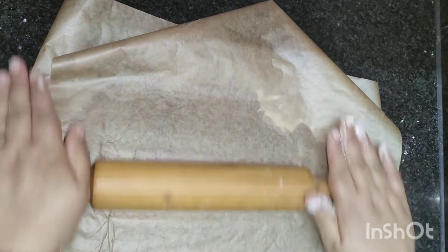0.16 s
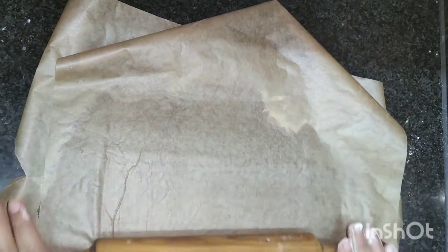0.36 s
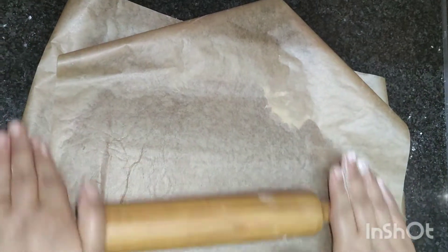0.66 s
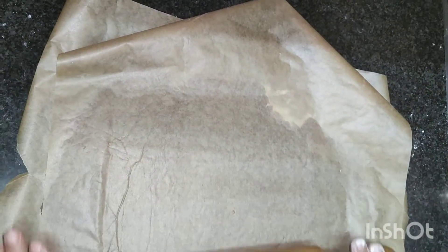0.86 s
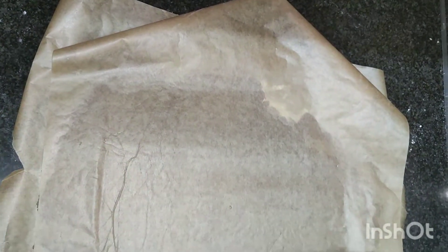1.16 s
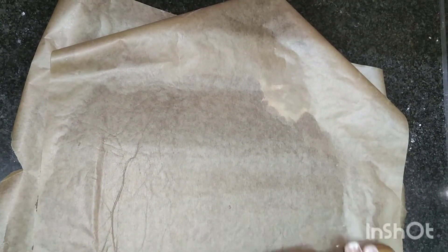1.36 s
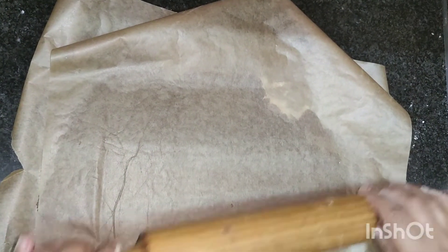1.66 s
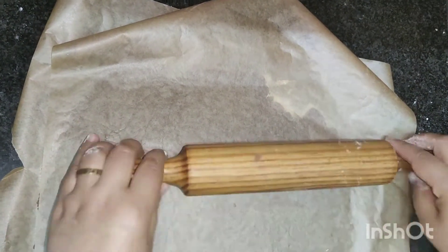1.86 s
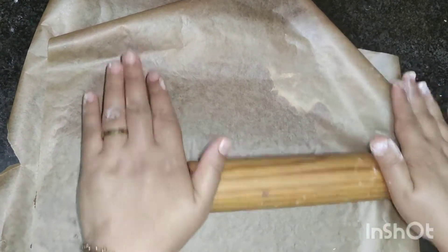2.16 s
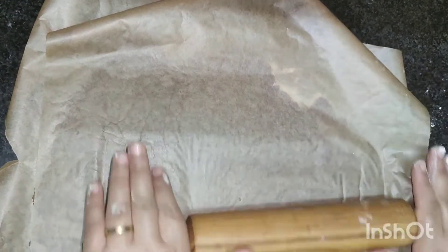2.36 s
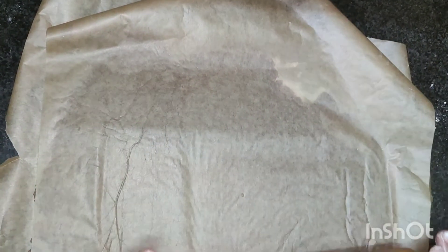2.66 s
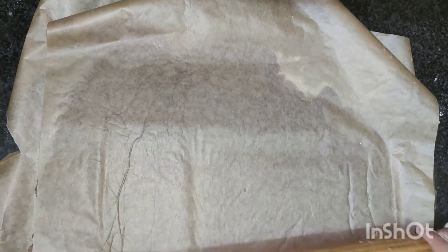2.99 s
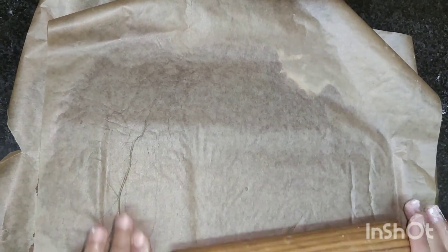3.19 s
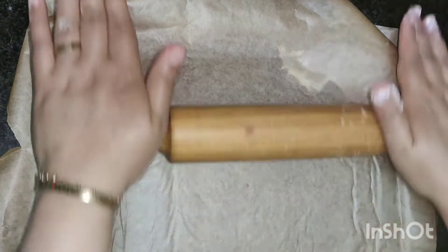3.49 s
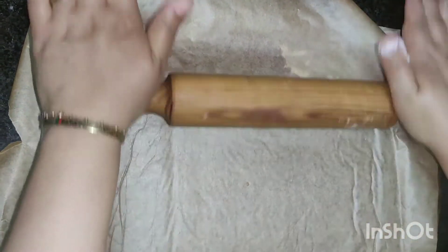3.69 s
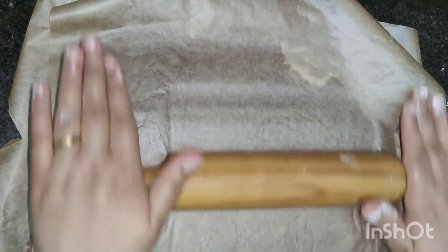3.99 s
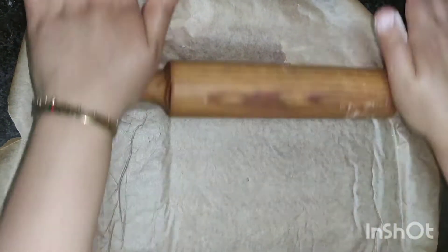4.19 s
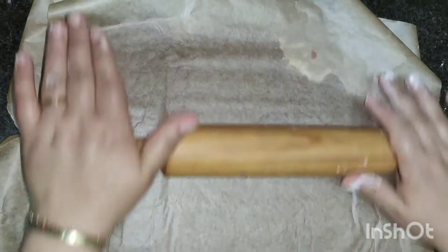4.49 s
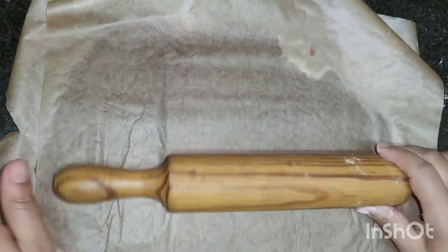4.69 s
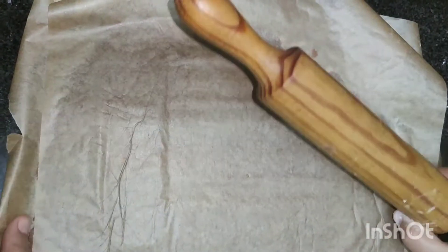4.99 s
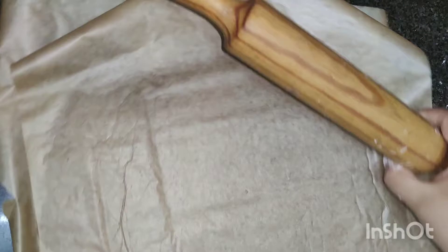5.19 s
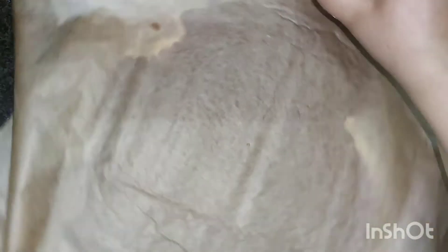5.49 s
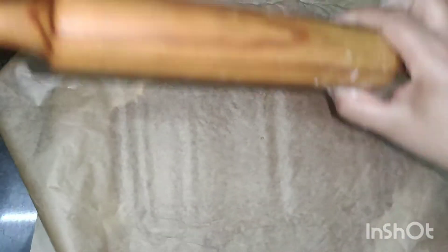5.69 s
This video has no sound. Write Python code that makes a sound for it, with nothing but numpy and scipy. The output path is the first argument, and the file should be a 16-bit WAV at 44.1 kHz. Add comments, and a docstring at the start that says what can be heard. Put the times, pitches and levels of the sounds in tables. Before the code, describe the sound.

Baking paper rustles and crackles under a wooden rolling pin, with a few dull thumps on a kitchen counter.

```python
"""Baking paper rubs and crackles as a wooden rolling pin is pushed over dough between two sheets on a
stone counter; then the sheets are turned. Sliding fibres hiss, the pressed paper sticks and slips, and
the bending sheet buckles in many tiny clicks and snaps at its creases. Set down, the pin clacks and
drives the low modes of the counter in dull thumps. A small kitchen adds a faint hush and a short tail."""
import sys
import numpy as np
from scipy import signal
from scipy.fft import rfft, irfft, next_fast_len
from scipy.io import wavfile
from scipy.ndimage import uniform_filter1d, map_coordinates

SR = 44100
rng = np.random.default_rng(int(sys.argv[2]) if len(sys.argv) > 2 else 0)


def log_audio(samples):
    """Write samples as a 16-bit WAV file to the path given in sys.argv[1]."""
    # one column per channel
    frames = np.atleast_2d(samples).T
    # limit to full scale, then quantise
    limited = np.clip(frames, -1, 1)
    pcm = np.round(limited * 32767).astype(np.int16)
    wavfile.write(sys.argv[1], SR, pcm)


N = 257984

# Pushes of the pin and pulls at the sheet. Each row: arrival at full speed in seconds, hold in seconds,
# run-up in seconds, crisp rustle in dB, duller rub in dB.
STROKES = [(0.095, 0.037, 0.12, -47, -54.5), (0.37, 0.077, 0.25, -54.5, -63),
           (0.53, 0.026, .08, -59.5, -63.5), (0.83, 0.055, 0.041, -47, -69), (0.942, 0.024, .06, -40, -53),
           (1.068, 0.03, .09, -40.5, -49.5), (1.225, 0.037, 0.045, -48, -53.5),
           (1.447, 0.021, 0.21, -41.5, -52.5), (1.598, 0.048, 0.16, -37.5, -49.5),
           (2.135, 0.039, 0.016, -32.5, -42.5), (2.24, 0.022, 0.046, -37, -54),
           (2.329, 0.0097, 0.069, -35.5, -34.5), (2.41, 0.052, 0.099, -36.5, -40),
           (2.53, 0.15, 0.085, -37.5, -45), (2.755, 0.017, 0.083, -29, -46), (2.85, 0.13, 0.12, -41.5, -50),
           (3.29, 0.18, 0.34, -55.5, -64), (3.495, 0.013, 0.076, -35.5, -42),
           (3.645, 0.027, 0.11, -32.5, -39.5), (3.72, 0.24, 0.058, -40.5, -46.5),
           (4.118, 0.13, 0.063, -44, -48), (4.243, 0.086, 0.052, -31, -39), (4.43, 0.081, 0.12, -36, -41),
           (4.691, 0.029, 0.087, -35.5, -44), (4.99, 0.055, 0.22, -34.5, -68),
           (5.159, .12, 0.23, -28, -40.5), (5.399, .12, 0.32, -28.5, -39.5),
           (5.58, 0.044, 0.15, -29.5, -52), (5.669, 0.05, 0.073, -37, -68)]
# The sheet creeping between strokes. Two values: rustle in dB, rub in dB.
CREEP_DB = [-67.5, -69]
# The loudest creases. Each row: start in seconds, level in dB, ripple in seconds, bass boost in dB.
CREASE_SNAPS = [(0.141, -31, 0.0039, -8), (0.226, -43, 0.007, -2), (0.283, -49.5, .006, 14),
                (0.327, -45.5, 0.0061, 24), (0.348, -41.5, 0.0052, 6.5), (0.814, -33.5, 0.0012, 15.5),
                (0.829, -35.5, 0.0049, 2), (0.852, -38, .002, 2), (0.873, -34.5, 0.0091, -5),
                (0.963, -35.5, 0.0056, -4), (1.018, -33.5, 0.0023, 2.5), (1.28, -37, 0.0038, 11.5),
                (1.366, -41.5, 0.0046, 6), (1.464, -35.5, 0.011, 1), (1.626, -27.5, 0.0017, -2),
                (2.11, -39.5, 0.014, 5), (2.137, -28, 0.012, -1.5), (2.242, -21.5, .001, -2.5),
                (2.309, -27.5, 0.012, -13), (2.332, -20.5, 0.0011, 0), (2.428, -20, 0.0053, -4),
                (2.446, -18.5, 0.0011, -22), (2.493, -26, 0.0056, -11), (2.523, -25, 0.01, -3),
                (2.560, -18.5, 0.0017, -21), (2.574, -25, 0.002, -2), (2.632, -27.5, 0.0098, -8),
                (2.713, -23.5, 0.011, -5.5), (2.805, -22, .011, -2.5), (2.973, -23.5, 0.00064, -2),
                (3.048, -37.5, 0.00033, -4), (3.173, -39, 0.01, 8), (3.273, -49, .007, 19),
                (3.509, -30.5, 0.0082, 3), (3.6321, -21.5, 0.0019, 4), (3.740, -23.5, .003, 2),
                (3.971, -31.5, 0.0086, -4), (4.165, -34, 0.0049, 0), (4.217, -24, 0.0088, -1),
                (4.230, -27, 0.0073, 7), (4.325, -23.5, 0.0061, 5.5), (4.442, -18.5, 0.0014, -7),
                (4.600, -39, 0.0064, 7.5), (4.773, -36, 0.0052, -18), (4.905, -20.5, 0.0018, 1.5),
                (4.968, -22.5, 0.0039, -35), (4.997, -26, .012, -8.5), (5.137, -18, 0.0024, -28),
                (5.181, -22.5, 0.013, -3), (5.280, -19, .004, 0.5), (5.505, -25, 0.016, -1.5),
                (5.599, -27.5, 0.017, -16)]
# Landings of the pin. Each row: start in seconds, push in dB, counter ring in dB, wooden clack in dB.
LANDINGS = [(0.6632, -57, -44.5, -64), (1.8836, -22, -26, -16), (2.138, -29.5, -34, -45),
            (3.1561, -37, -22.5, -34.5), (4.217, -61, -44.5, -56), (4.686, -46, -31.5, -44),
            (5.603, -41, -42.5, -29)]
# Normal modes. Each row: frequency in Hz, level in dB, time to decay by 60 dB in seconds.
COUNTER_MODES = [(64, -6, 0.36), (90, -14, 0.59), (110.3, -2, 0.44), (117.4, 2.5, 0.13), (145, -9, 0.27),
                 (232, -19, 0.1)]
PIN_MODES = [(320, -17, .12), (366, -20, .16), (560, -21, .08), (700, -17, .08), (985, -16, .07),
             (1070, -16, .08), (1400, -13, .06), (2650, -9, .05), (6900, -2, .025)]
# Spectra of the noise sources. Each row: frequency in Hz, relative spectral density in dB.
HUSH_SPECTRUM = [(20, 13.5), (60, 2.5), (105, 10.5), (160, 4), (240, -9.5), (400, -3), (800, -18.5),
                 (2000, -31), (7000, -68), (9000, -30), (15500, -23)]
SLAP_SPECTRUM = [(100, -4), (250, 5), (450, -15), (1200, -1), (3000, 2), (5500, -3.5), (7200, 3.5),
                 (9000, -13), (15000, -12.5)]
SNAP_SPECTRUM = [(150, -17), (400, -10), (1200, -4), (2700, -1.5), (4500, 0), (7300, 1.5), (8200, -3),
                 (9300, -7.5), (12000, -7), (15500, -5)]
RUB_SPECTRUM = [(100, -11), (240, -17), (350, -7), (480, -5.5), (700, -2.5), (1150, 1), (2100, -3),
                (3200, -11), (6000, -26)]
FIBRE_SPECTRUM = [(200, -26), (700, -13), (1500, -5), (2400, 0), (4500, -.5), (7400, -.5), (8200, -6),
                  (9300, -13), (15500, -13)]
BUCKLE_SPECTRUM = [(200, -28), (700, -15), (1500, -7.5), (2500, -1), (4500, -.3), (7400, 0), (8200, -4.5),
                   (9300, -10), (12000, -10.5), (15500, -8)]
# Reverberation of the kitchen. Each row: frequency in Hz, time to decay by 60 dB in seconds.
KITCHEN_T60 = [(150, 0.22), (800, 0.11), (2500, 0.29), (7000, 0.25), (15000, 0.13)]
# Likeness of the sound at two spaced microphones. Each row: frequency in Hz, correlation from -1 to 1.
COHERENCE = [(60, 0.76), (150, 0.38), (350, 0.86), (700, -0.15), (1400, -0.25), (3000, 0.098),
             (8000, 0.052)]
# Bass roll-off of the microphones. Two values: left corner in Hz, right corner in Hz.
BASS_CORNERS_HZ = [16, 88]


def amp(db):
    """Amplitude ratio of a level in decibels."""
    return 10 ** (np.asarray(db) / 20)


def unit(x):
    """Normalisation to rms 1."""
    return x / np.sqrt(np.mean(x ** 2) + 1e-20)


def along(points, hz):
    """Interpolation of (Hz, value) points on a logarithmic frequency axis."""
    f, v = np.transpose(points)
    return np.interp(np.log(hz + 1), np.log(f + 1), v)


def scatter(shape):
    """Gaussian draws limited to two standard deviations."""
    return np.clip(rng.standard_normal(shape), -2, 2)


def wobble(per_second):
    """Slow random modulation: a spline through Gaussian knots."""
    return map_coordinates(rng.standard_normal(2048), [np.arange(N) * per_second / SR], mode="mirror")


def add(track, start, sound):
    """Superposition of a sound on a track, from a start in seconds."""
    i = max(round(start * SR), 0)
    track[:, i:i + sound.shape[-1]] += sound[..., :N - i]


def noise(spectrum, size, tint=lambda hz: 0):
    """Partial coherence: coloured stereo noise of rms 1, alike in the bass, unrelated in the treble."""
    m = next_fast_len(size)
    hz = np.fft.rfftfreq(m, 1 / SR)
    angle = np.arccos(np.clip(along(COHERENCE, hz), -1, 1)) / 2
    coloured = rfft(rng.standard_normal((2, m))) * amp(along(spectrum, hz) + tint(hz))
    mid, side = irfft(coloured * [np.cos(angle), np.sin(angle)], m)[:, :size]
    return unit(np.array([mid + side, mid - side]))


def patch_colour(depth_db):
    """Irregular resonances of one patch of paper: dB as a function of Hz."""
    knots_hz = np.linspace(0, np.sqrt(SR / 2), 80) ** 2
    peaks_db = depth_db * scatter(len(knots_hz))
    return lambda hz: np.interp(hz, knots_hz, peaks_db)


def burst(t, rise, t60, flutter_db, flutter_t60, ripple=0):
    """Two-slope decay: a transient holds while it ripples, then dies into the sheet's weaker flutter."""
    after = np.maximum(t - ripple, 0)
    attack = 1 - np.exp(-(t / rise) ** 2)
    return attack * np.hypot(amp(-60 * after / t60), amp(flutter_db - 60 * after / flutter_t60))


def room_hush():
    """Ambient noise: steady, faint and strongest in the bass."""
    return amp(-57) * noise(HUSH_SPECTRUM, size=N)


def kitchen_reverb(x):
    """Diffuse reflection from tiles and cupboards: each band decays exponentially at its own rate."""
    hz, t, bands = signal.stft(noise([(100, 0), (16000, 0)], size=SR // 3), SR, nperseg=256)
    decay = amp(-60 * t / along(KITCHEN_T60, hz)[:, None])
    tail = signal.istft(bands * decay, SR, nperseg=256)[1]
    tail = np.pad(tail, ((0, 0), (300, 0)))  # reflections arrive 7 ms late
    return signal.fftconvolve(x, tail / np.linalg.norm(tail[0]), axes=1)[:, :N]


def ringing(modes, t):
    """Free vibration: damped modes excited by one blow, a little differently each time."""
    return sum(amp(db + rng.normal(0, 1) - 60 * t / t60)
               * np.sin(2 * np.pi * hz * rng.normal(1, 0.01) * t) for hz, db, t60 in modes)


def pin_landings():
    """Impact excitation: wood slaps paper and rings; cushioned by dough, it makes the counter boom."""
    clacks, thumps = np.zeros((2, 2, N))
    t = np.arange(SR // 2) / SR
    cushion = signal.butter(2, [55, 320], "band", fs=SR, output="sos")
    contact = np.sin(np.pi * np.minimum(t / .014, 1)) ** 2
    push = -np.sin(2 * np.pi * 135 * (t - .0065)) * contact  # little more than one cycle: down and back
    for start, push_db, ring_db, clack_db in LANDINGS:
        slap = noise(SLAP_SPECTRUM, size=len(t), tint=patch_colour(depth_db=2))
        slap *= burst(t, rise=.0035, t60=.05, flutter_db=-17, flutter_t60=.17, ripple=.003)
        wood = np.array([ringing(PIN_MODES, t), ringing(PIN_MODES, t)]) * (1 - np.exp(-(t / .004) ** 2))
        boom = -signal.sosfilt(cushion, ringing(COUNTER_MODES, t) * (1 - np.exp(-t / .004)))
        add(clacks, start - .002, amp(clack_db) * (slap + amp(-9) * wood))
        add(thumps, start, amp(push_db) * push + amp(ring_db) * boom)
    return clacks, thumps


def stroke_levels():
    """Incoherent addition: the powers of strokes that swell, hold and settle sum to rustle and rub dB."""
    run_up_db, settle_db_per_s = 20, 235
    t = np.arange(N) / SR
    power = np.outer(amp(CREEP_DB) ** 2, np.ones(N))
    for arrival, hold, run_up, rustle_db, rub_db in STROKES:
        below_db = run_up_db * np.maximum(arrival - t, 0) / run_up
        below_db += settle_db_per_s * np.maximum(t - arrival - hold, 0)
        power += (amp([[rustle_db], [rub_db]]) * amp(-np.minimum(below_db, 80))) ** 2
    return 10 * np.log10(power) + 0.48 * wobble(per_second=22)  # the hands never move quite steadily


def wrinkles(rustle_db, per_second=7.1, ripple=0.012):
    """Random stress release: snaps as strong as the motion that frees them, in CREASE_SNAPS rows."""
    count = round(per_second * N / SR)
    return [(i / SR, rustle_db[i] - 2 + 3.5 * size, ripple, 8 + 10 * body)
            for i, (size, body) in zip(rng.integers(N, size=count), scatter((count, 2)))]


def creases(rustle_db):
    """Snap-through: a crease gives way at once or in a quick ripple and shakes its own patch of sheet."""
    snaps = np.zeros((2, N))
    t = np.arange(4096) / SR
    for start, db, ripple, body_db in CREASE_SNAPS + wrinkles(rustle_db):
        patch = patch_colour(depth_db=4.5)
        fizz_db = -3.5 + 0.2 * (db + 26.5)  # harder snaps are brighter
        tilt = [(1900, body_db), (3000, 0), (7500, 0.02), (9500, fizz_db)]
        ring = noise(SNAP_SPECTRUM, size=len(t), tint=lambda hz: patch(hz) + along(tilt, hz))
        envelope = burst(t, rise=.0015, t60=.028, flutter_db=-13, flutter_t60=.09, ripple=ripple)
        add(snaps, start, amp(db) * ring * envelope)
    return snaps


def crinkle(spectrum, per_second, spread_db, t60, colour_db, patches):
    """Shot noise: tiny random impulses of uneven size excite patches of paper, each of its own colour."""
    t = np.arange(2048) / SR
    onsets = np.flatnonzero(rng.random(N) < per_second / SR)
    sizes = rng.choice([-1, 1], N) * amp(spread_db * scatter(N))
    patch = rng.integers(patches, size=N)[onsets]
    envelope = burst(t, rise=.0002, t60=t60, flutter_db=-14, flutter_t60=.06)
    clicks = np.zeros((2, N))
    for k in range(patches):
        impulses = np.bincount(onsets, sizes[onsets] * (patch == k), N)
        ring = noise(spectrum, size=len(t), tint=patch_colour(colour_db)) * envelope
        clicks += signal.oaconvolve(impulses[None], ring, axes=1)[:, :N]
    # evened to rms 1 over 27 ms, so that the click rate does not set the level
    power = np.abs(uniform_filter1d(np.mean(clicks ** 2, 0), size=1200))
    return clicks / np.sqrt(power + 1e-9)


def flexing(x, depth_db):
    """Time-varying resonance: as a sheet bends, narrow bands of colour come and go."""
    bands = signal.stft(x, nperseg=1024)[2]
    blur = np.outer(np.hanning(6), np.hanning(8))
    shared, left, right = [unit(signal.fftconvolve(rng.standard_normal(bands.shape[1:]), blur, "same"))
                           for _ in range(3)]
    colour = unit(np.array([2 * shared + left, 2 * shared + right]))
    gain = amp(depth_db * np.clip(colour, -2, 2))
    return signal.istft(bands * unit(gain), nperseg=1024)[1][:, :N]


def sliding_paper(rustle_db, rub_db):
    """Friction and buckling: slow sliding is mostly fibre hiss; faster motion brings denser crackle."""
    vigour = amp(0.36 * (rustle_db + 39.5))
    buckles_per_s = 600 * vigour
    crackle = crinkle(BUCKLE_SPECTRUM, buckles_per_s, spread_db=6, t60=.011, colour_db=1.5, patches=10)
    hiss = noise(FIBRE_SPECTRUM, size=N) * amp(1.1 * wobble(per_second=90))
    crackle_share = np.clip(.55 * vigour, .3, .75)
    rustle = np.sqrt(crackle_share) * crackle + np.sqrt(1 - crackle_share) * hiss
    # under the pin the paper sticks and slips, damped by the dough
    rub = crinkle(RUB_SPECTRUM, 2 * buckles_per_s, spread_db=3.5, t60=.026, colour_db=1, patches=8)
    return flexing(amp(rustle_db) * rustle + amp(rub_db) * rub, depth_db=3.8)


def scene():
    """Superposition: nearby paper and pin, their reverberation, the counter's thumps and the hush."""
    clacks, thumps = pin_landings()
    rustle_db, rub_db = stroke_levels()
    direct = sliding_paper(rustle_db, rub_db) + creases(rustle_db) + clacks
    thumps *= amp([[-.6], [.6]])  # slightly to the right
    return direct + amp(-10) * kitchen_reverb(direct) + thumps + room_hush()


def record(dry):
    """Band limiting: two microphones lose the deep bass unequally and share a steep treble cutoff."""
    top_hz = 16050
    m = next_fast_len(N + 8192)
    hz = np.fft.rfftfreq(m, 1 / SR)
    high_pass = np.array([1j * hz / (corner_hz + 1j * hz) for corner_hz in BASS_CORNERS_HZ])
    low_pass = 1 / np.sqrt(1 + (hz / top_hz) ** 200)
    return irfft(rfft(dry, m) * high_pass * low_pass, m)[:, :N]


dry = scene()
out = record(dry)
log_audio(out)
```